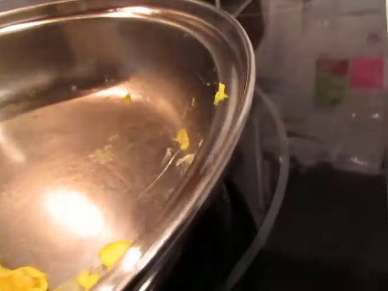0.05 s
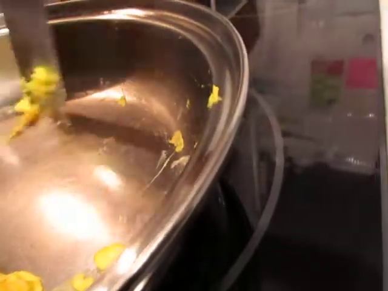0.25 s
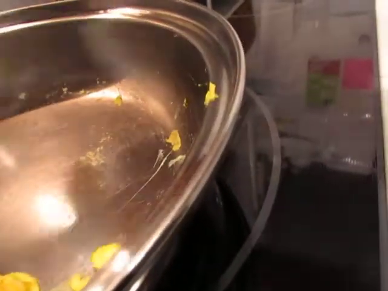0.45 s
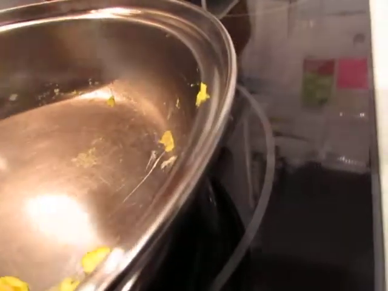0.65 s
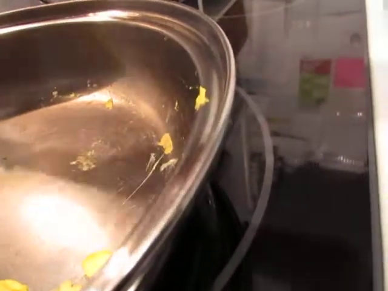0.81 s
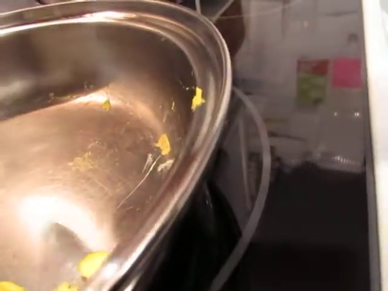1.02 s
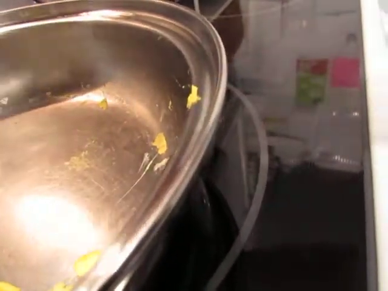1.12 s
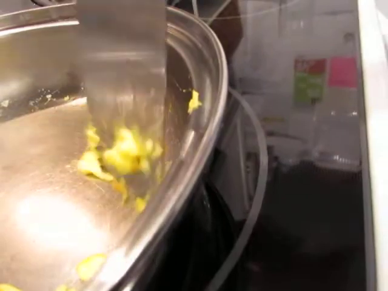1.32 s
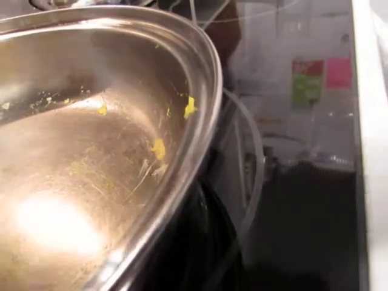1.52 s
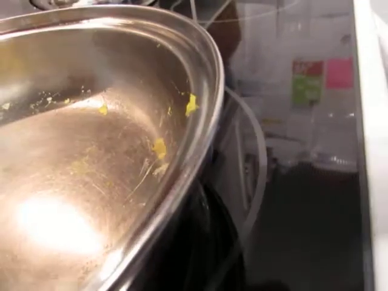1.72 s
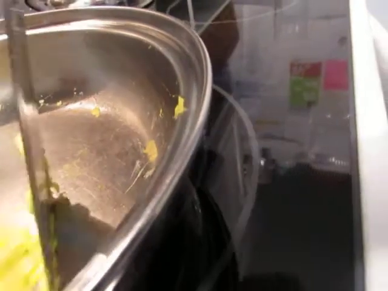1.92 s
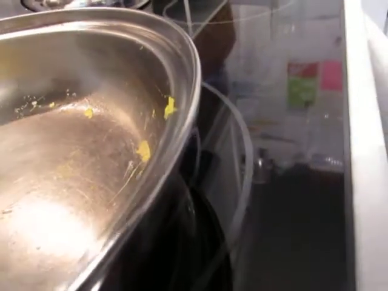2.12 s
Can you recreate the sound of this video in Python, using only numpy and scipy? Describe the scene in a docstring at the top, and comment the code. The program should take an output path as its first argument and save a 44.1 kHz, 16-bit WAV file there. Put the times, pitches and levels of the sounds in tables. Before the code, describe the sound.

A utensil clanks hard on a steel skillet three times, among lighter taps and slightly squeaky scrapes. The pan then thuds on the burner. Egg sizzles faintly and appliances hum in a small kitchen, heard up close.

```python
"""In a small kitchen, appliances hum and egg sizzles faintly as a utensil scrapes a steel skillet.
Friction drives the modes of blade and pan, with brief squeaks where the blade catches. At 0.2, 0.7
and 1.3 s, among lighter taps, hard knocks excite the same pan modes, quickly damped by the egg.
Near 1.9 s the base thuds on the burner grate, and a last scrape follows.
Throughout, the room adds a short reverberation to the direct sound at a nearby camera."""
import sys
import numpy as np
from scipy import signal
from scipy.fft import rfft, irfft, next_fast_len
from scipy.io import wavfile
from scipy.ndimage import uniform_filter1d

SR = 44100
rng = np.random.default_rng(int(sys.argv[2]) if len(sys.argv) > 2 else 0)


def log_audio(samples):
    """Write samples as a 16-bit WAV file to the path given in sys.argv[1]."""
    # one column per channel
    frames = np.atleast_2d(samples).T
    # limit to full scale, then quantise
    limited = np.clip(frames, -1, 1)
    pcm = np.round(limited * 32767).astype(np.int16)
    wavfile.write(sys.argv[1], SR, pcm)


N = 94815
TIME, RING_TIME = np.arange(N) / SR, np.arange(SR // 3) / SR
SIDE = np.array([[.5], [-.5]])  # shares a difference between left and right
TREBLE_HZ = 2840


def amp(db):
    return 10 ** (np.asarray(db) / 20)


def unit(x):
    return x / np.sqrt(np.mean(x ** 2) + 1e-20)


def along(points, hz):
    """Interpolation on a logarithmic frequency axis."""
    f, values = np.transpose(points)
    return np.interp(np.log(hz + 1), np.log(f + 1), values)


def filtered(x, response):
    """Linear filtering: the spectrum times a frequency response."""
    size = next_fast_len(x.shape[-1] + SR // 2)
    return irfft(rfft(x, size) * response(np.fft.rfftfreq(size, 1 / SR)), size)[..., :x.shape[-1]]


def resonances(rows):
    """Superposition of second-order resonators of alternating sign."""
    return lambda f: sum((-1) ** k * amp(db) * 1j * f * width / (hz * hz - f * f + 1j * f * width)
                         for k, (hz, width, db) in enumerate(rows))


def ringing(modes):
    """Modal response: bandwidth is inversely proportional to decay time."""
    return resonances([(hz, np.log(1000) / np.pi / t60, db) for hz, db, t60 in modes])


def tail(t60s):
    """Diffuse decay: each band of stereo noise dies at its own rate."""
    hz, t, spectrum = signal.stft(rng.standard_normal((2, SR // 3)), SR, nperseg=128)
    x = signal.istft(spectrum * amp(-60 * t / along(t60s, hz)[:, None]), SR, nperseg=128)[1]
    return x / np.linalg.norm(x[0])


def grains(per_s, spread_db):
    """Shot noise: independent clicks of uneven size."""
    hit = rng.random(N) < per_s / SR
    return unit(hit * rng.standard_normal(N) * amp(spread_db * rng.exponential(size=N)))


def stereo_noise(response, coherence):
    """Partial coherence: the ratio of mid to side noise sets how alike the channels are."""
    angle = lambda hz: np.arccos(np.clip(along(coherence, hz), -1, 1)) / 2
    mid, side = filtered(rng.standard_normal((2, N)),
                         lambda hz: response(hz) * [np.cos(angle(hz)), np.sin(angle(hz))])
    return unit(np.array([mid + side, mid - side]))


# hum resonances: (frequency [Hz], bandwidth [Hz], gain [dB])
HUM_BANDS = [(46.3, 18, -6), (93, 5.8, -0.5), (154.3, 5.1, -3), (246.4, 10, -2)]
# rumble spectrum: (frequency [Hz], gain [dB])
RUMBLE_SPECTRUM = [(12, -34), (20, -18), (156, -15), (205, -28.5), (248, -28), (900, -24), (1170, -63),
                   (1980, -120)]
# envelope of both: (time [s], relative level [dB])
APPLIANCE_LEVEL = [(0.0, -51), (0.14, -52), (0.43, -60), (0.74, -59), (0.87, -53.5), (1.3, -51.5),
                   (1.85, -53), (2.15, -47)]
# their coherence: (frequency [Hz], left-right correlation [-])
APPLIANCE_COHERENCE = [(40, 1), (200, 0.65), (900, 0.2)]
def appliances():
    """Narrow-band noise fluctuates slowly, giving a wavering hum over a broad rumble."""
    hum = stereo_noise(resonances(HUM_BANDS), APPLIANCE_COHERENCE)
    rumble = stereo_noise(lambda hz: amp(along(RUMBLE_SPECTRUM, hz)), APPLIANCE_COHERENCE)
    return amp(np.interp(TIME, *np.transpose(APPLIANCE_LEVEL))) * (amp(-1) * hum + amp(-2) * rumble)


# frying envelope: (time [s], relative level [dB])
SIZZLE_LEVEL = [(0.0, -46), (0.12, -49), (0.28, -48), (0.45, -54.5), (0.56, -58), (0.77, -55.5),
                (0.91, -42.5), (1.09, -50), (1.41, -53), (1.62, -55.5), (1.84, -55.5), (1.94, -47.5),
                (2.07, -45), (2.15, -46)]
# its spectrum: (frequency [Hz], gain [dB])
SIZZLE_SPECTRUM = [(240, -39), (400, -18), (452, 2.5), (680, -18), (723, -16), (1010, -3), (5680, -2),
                   (14100, -4), (15000, -35.5)]
# its coherence: (frequency [Hz], left-right correlation [-])
SIZZLE_COHERENCE = [(60, 1), (240, -0.11), (950, 0.81), (3770, 0.32), (15000, -0.48)]
def sizzle():
    """Frying egg is a random source: hiss and tiny pops share one spectrum."""
    fizz = lambda hz: amp(along(SIZZLE_SPECTRUM, hz))
    pops = unit(filtered(grains(per_s=1500, spread_db=2), fizz))
    hiss = stereo_noise(fizz, SIZZLE_COHERENCE)
    return amp(np.interp(TIME, *np.transpose(SIZZLE_LEVEL)) + 4.5) * (hiss + amp(-8) * pops)


# room decay: (frequency [Hz], T60 [s])
KITCHEN_T60, KITCHEN_DB = [(200, 0.22), (2000, 0.69), (10000, 0.15)], -22
def kitchen(sound):
    """Reverberation: convolution with a delayed, diffuse room response."""
    delayed = np.pad(sound, ((0, 0), (200, 0)))
    return amp(KITCHEN_DB) * signal.fftconvolve(delayed, tail(KITCHEN_T60), axes=1)[:, :N]


# catches of the blade: (centre time [s], half-length [s], frequency [Hz], relative level [dB])
CATCHES = [(.53, .04, 553, -52), (0.537, 0.024, 2017, -51), (0.863, .02, 1650, -44),
           (0.876, .02, 3400, -34), (0.891, .015, 1765, -42), (0.904, .02, 2140, -34),
           (0.911, .02, 3530, -38), (0.942, .02, 2890, -50), (1.014, .02, 3500, -40),
           (1.068, 0.015, 3470, -30), (0.981, 0.018, 1688, -33), (0.983, 0.017, 3500, -34),
           (0.987, .015, 2220, -31), (1.072, .022, 1560, -32.5), (1.391, .03, 2220, -36.5),
           (1.414, .025, 1480, -34), (1.443, .025, 1420, -48.5), (2.038, .03, 897, -43),
           (2.09, .025, 1910, -38), (2.122, .03, 1944, -38)]
def squeaks(roughness=.25):
    """Stick-slip: the blade catches and one mode sings, rough in amplitude and phase."""
    out = np.zeros(N + SR)
    for time, half_s, hz, db in CATCHES:
        n = round(2 * half_s * SR)
        drift = roughness * unit(uniform_filter1d(rng.standard_normal(SR // 5), size=150))[:n]
        tone = (1 + drift) * np.sin(2 * np.pi * hz * TIME[:n] + drift)
        out[round((time - half_s) * SR):][:n] += amp(db + 3) * np.hanning(n) ** 2 * tone
    return out[:N]


def wandering_contact(x, depth_db=2):
    """Modal coupling depends on position: resonances come and go as the contact wanders."""
    spectrum = signal.stft(x, nperseg=256)[2]
    patches = uniform_filter1d(rng.standard_normal(spectrum.shape), size=3, axis=0)
    patches = uniform_filter1d(patches, size=7, axis=1)
    return unit(signal.istft(spectrum * amp(depth_db * unit(patches)), nperseg=256)[1][:N])


# blade modes: (frequency [Hz], bandwidth [Hz], gain [dB])
BLADE_MODES = [(1000, 60, -9), (1100, 50, -9), (1680, 70, 0), (2140, 120, 0), (2800, 200, -2),
               (3420, 90, -2), (3530, 60, -4), (4150, 90, -8), (5250, 350, -10), (5900, 250, -12),
               (6820, 120, -10), (7500, 150, -11), (8820, 200, -14), (10200, 400, -12)]
# friction spectrum between the modes: (frequency [Hz], gain [dB])
GRIT_SPECTRUM = [(350, -71), (600, -72), (940, -13.5), (1180, -17), (2190, -15.5), (3920, -25),
                 (10300, -13.5), (13700, -5), (15500, -102)]
# one list per stretch of scraping, in relative levels: (time [s], level [dB], treble [dB],
# base rumble [dB]); one scrape runs from 0.76 to 1.04 s, with a tap at 0.975 s
SCRAPE_STRETCHES = [
    [(0.0, -44.5, 9.5, -1.5), (0.022, -39, -30, -24), (0.052, -64, 10, -17), (0.114, -73, 20, -4),
     (0.122, -35, -4, -37), (0.138, -65.5, 15.5, 1), (0.192, -48.5, -7, -12), (0.2, -47, 8, -1)],
    [(0.24, -32, -2, -15), (0.276, -44, -14, -24), (0.286, -30, -14, -25), (0.314, -38.5, -23, -23),
     (0.35, -46.5, -6.5, -33), (0.408, -43, 4, -10.5), (0.488, -55.5, -9, -3), (0.53, -45.5, -5, -19),
     (0.56, -64, 1, -16)],
    [(0.76, -37.5, -2, -12), (0.808, -48.5, -8, -12), (0.836, -45.5, -10, -28), (0.862, -30.5, -6.5, -36),
     (0.898, -31.5, -6, -26), (0.906, -27.5, -5.5, -36), (0.932, -39, 3.5, -19), (0.96, -38.5, 2, -28),
     (0.97, -35.5, -0.5, -28)],
    [(0.995, -42, 3.5, -14), (1.017, -37, -6, -28), (1.031, -44, -8, -19), (1.04, -45, 1, -14)],
    [(1.065, -44, 9.5, -18), (1.073, -37.5, 4.5, -26), (1.099, -59.5, 10, 2), (1.12, -48, -2, -8.5)],
    [(1.35, -31, -9, -2), (1.374, -40.5, -6, -8), (1.414, -46, 3, -18), (1.42, -39.5, -1, -14),
     (1.506, -47, -4.5, 0.5), (1.554, -46.5, -21, -9), (1.578, -42, -17, -8), (1.628, -45.5, -10, -1),
     (1.66, -51, -15, -41)],
    [(1.92, -61, 16, 3), (1.926, -51, 5.5, 15), (1.962, -64.5, 11.5, 11.5), (2.026, -44.5, -2, 3),
     (2.042, -37.5, -11, -21), (2.076, -42.5, -6, 1.5), (2.09, -40, -27, -26), (2.098, -39, -14, -15),
     (2.15, -31.5, -7.5, -17)],
]
def scrapes(fade_s=0.015, top_hz=13300):
    """Forced vibration: grit under the edge drives blade and pan wall, and shakes the base."""
    rows = []
    for stretch in SCRAPE_STRETCHES:
        first, last = stretch[0], stretch[-1]
        rows += [(first[0] - fade_s, -90, *first[2:]), *stretch, (last[0] + fade_s, -90, *last[2:])]
    times, *columns = np.transpose(rows)
    db, treble_db, base_db = [np.interp(TIME, times, column) for column in columns]
    grit = grains(per_s=9000, spread_db=1.5)
    blade = unit(filtered(grit, resonances(BLADE_MODES)))
    wall = unit(filtered(grit, ringing(WALL_MODES)))
    rasp = unit(filtered(grit, lambda hz: amp(along(GRIT_SPECTRUM, hz))))
    steel = wandering_contact(blade + amp(0.5) * wall + amp(-2.5) * rasp)
    steel = filtered(steel, lambda hz: 1 / (1 + (hz / top_hz) ** 30))
    low = filtered(steel, lambda hz: 1 / (1 + (hz / TREBLE_HZ) ** 4))
    base = unit(filtered(rng.standard_normal(N), ringing(BASE_MODES[2:])))
    return amp(db) * (low + amp(treble_db + 5) * (steel - low) + amp(base_db) * base)


def struck_mode(hz, db, t60, scatter_db=1.5, beam_db=5.5):
    """Free vibration: a damped sinusoid of wavering phase, beamed to a random side."""
    start_db = db + scatter_db * rng.normal() + beam_db * SIDE * rng.normal()
    waver = 0.03 * hz / TREBLE_HZ * np.cumsum(rng.standard_normal(len(RING_TIME)))
    return amp(start_db - 60 * RING_TIME / t60) * np.sin(2 * np.pi * hz * RING_TIME + waver)


# modes of the pan base: (frequency [Hz], relative level [dB], T60 [s])
BASE_MODES = [(133.3, -3, 0.29), (184.4, 7.5, 0.098), (307, -0.5, .1)]
def base_thud(low_db, high_db):
    """Impact on the burner grate excites the low modes of the base."""
    first, second, third = [struck_mode(*mode) for mode in BASE_MODES]
    return (amp(low_db) * (first + second) + amp(high_db) * third).mean(axis=0)


# decay of the pan's dense modes: (frequency [Hz], T60 [s])
WASH_T60 = [(300, 0.21), (1500, 0.088), (5000, 0.096), (12000, 0.082)]
# spectrum of a blow: (frequency [Hz], gain [dB])
BLOW_SPECTRUM = [(240, -34), (400, -13.5), (1380, -6), (1840, -8.5), (4650, -20), (5430, -7), (6440, -11.5),
                 (13300, -10.5), (16000, -53)]
def contact_burst(crack_t60=0.0071):
    """A brief contact is broadband: a crack, then a wash of overlapping modes."""
    wash = unit(tail(WASH_T60)[:, :len(RING_TIME)])
    crack = amp(-4.5 - 60 * RING_TIME / crack_t60) * rng.standard_normal(len(RING_TIME))
    hz = np.linspace(0, SR / 2, 129)
    power = amp(2 * along(BLOW_SPECTRUM, hz))  # minimum_phase takes the square root
    colour = signal.minimum_phase(signal.firwin2(255, hz, power, fs=SR))
    return signal.lfilter(colour / np.linalg.norm(colour), 1, crack + amp(-32) * wash)


# egg-damped modes of the pan wall: (frequency [Hz], relative level [dB], T60 [s])
WALL_MODES = [(948, -13.5, 0.075), (1097, -10, 0.05), (1363, -11, 0.061), (1541, -13.5, 0.035),
              (1617, -11.5, 0.037), (1866, -4, 0.052), (2027, -11, 0.12), (2197, -23, 0.14),
              (2600, -8.5, 0.11), (2860, -5, 0.037), (3127, -9.5, 0.032), (3360, -19, 0.13),
              (4365, -8, 0.027), (3634, -7.5, 0.04), (4180, -11, 0.083), (1494.5, -5, 0.023),
              (2880, -6, 0.029), (5330, -2.5, 0.013), (4820, -9.5, 0.033), (5360, -15.5, 0.053),
              (5770, -11.5, 0.12), (6910, -5, 0.027), (7610, -7.5, 0.054), (8240, -30, 0.18),
              (9820, -12.5, 0.053), (10330, -7.5, 0.043), (11200, -36, 0.088)]
def wall_ring(favoured_hz, boost_db=10, width_octaves=0.056):
    """Modal superposition: the striking point favours modes near certain frequencies."""
    boost = lambda hz: sum(boost_db * np.exp(-.5 * (np.log2(hz / centre) / width_octaves) ** 2)
                           for centre in favoured_hz)
    return sum(struck_mode(hz, db + boost(hz), t60) for hz, db, t60 in WALL_MODES)


# blows, in relative levels: (time [s], level [dB], low thud [dB], high thud [dB], treble [dB],
# top band [dB], left minus right [dB], three favoured frequencies [Hz], rise time [ms])
BLOWS = [(0.119, -36, -35, -14.5, -3, -28, 2.5, 1590, 1670, 4690, 0.4),
         (0.217, -1.5, -35.5, -40, -7.5, -15.5, 0.67, 1536, 1720, 5180, 0.48),
         (0.283, -24, -29, -40, -11, -34, 1.5, 1510, 1830, 5200, 0.52),
         (0.342, -29.5, -40, -42, -12.5, -32, 0.5, 940, 2830, 5160, 0.28),
         (0.392, -27.5, -43, -34, -12.5, -16.5, 1.1, 1660, 3040, 5040, 0.94),
         (0.458, -30.5, -26, -14.5, -18, -17, 1.7, 1100, 1980, 5000, 0.59),
         (0.518, -24.5, -45, -32, -20, -29, 1.1, 990, 2150, 6740, 0.27),
         (0.617, -47.5, -28, -28, -6.5, -5.5, 2.2, 1620, 3400, 8000, 0.48),
         (0.662, -44.5, -34, -27, -11, -12.5, 4.5, 1610, 1790, 7240, 0.26),
         (0.725, -5, -30.5, -41, -9, -19.5, 0.38, 932, 3040, 4930, 0.21),
         (0.975, -31.5, -47, -45, 3.5, -6, 2.3, 1550, 2210, 6100, 0.46),
         (1.319, -1.5, -31.5, -19.5, -11, -15.5, 0.33, 1500, 1930, 8600, 0.27),
         (1.384, -23.5, -24, -18.5, -17, -17.5, 1.5, 1510, 2200, 5650, 0.4),
         (1.406, -27, -38, -27, -14.5, -16.5, 1.9, 1490, 2900, 5570, 0.33),
         (1.428, -33, -44, -34, -1, -11, 1.6, 1410, 2200, 6250, 0.33),
         (1.452, -26, -40, -23, -10, -31, 1.3, 1520, 1930, 5850, 0.33),
         (1.579, -31.5, -24, -21, -16, -25, 1.3, 1530, 1840, 5400, 0.51),
         (1.761, -43.5, -29, -29, -12.5, -9, 5.8, 1110, 1940, 5550, 0.5),
         (1.89, -17.5, -15.5, -8, -21.5, -25, 0.29, 1320, 1826, 4470, 0.22),
         (2.088, -28, -29, -29, -22, -33, 1.7, 1100, 1870, 4850, 0.67)]
def knocks(top_band_hz=9000, lag_s=0.001025, thud_lead_s=.0012):
    """Impulse excitation: each blow of the utensil sets wall and base ringing anew."""
    out, n = np.zeros((2, N + SR)), len(RING_TIME)
    lowpasses = [signal.butter(2, hz, fs=SR, output="sos") for hz in (TREBLE_HZ, top_band_hz)]
    for time, db, low_db, high_db, treble_db, top_db, balance_db, *favoured_hz, rise_ms in BLOWS:
        attack = 1 - np.exp(-(1000 * RING_TIME / rise_ms) ** 2)
        wall = attack * (contact_burst() + amp(-12) * wall_ring(favoured_hz))
        low, body = [signal.sosfilt(sos, wall) for sos in lowpasses]
        clank = low + amp(treble_db + 10) * (body - low) + amp(top_db + 17.5) * (wall - body)
        onset = time + lag_s
        out[:, round(onset * SR):][:, :n] += amp(db + SIDE * balance_db) * clank
        out[:, round((onset - thud_lead_s) * SR):][:, :n] += amp(db + 3) * base_thud(low_db, high_db)
    return out[:, :N]


# stereo balance of the direct sound: (frequency [Hz], left minus right [dB])
PAN_BALANCE = [(300, 1), (950, 1.5), (2400, 3), (6000, 2), (9000, -1), (13000, 1.5)]
def scene(right_delay_s=1.8e-5):
    """Level and time differences place the pan slightly left, before the room and background."""
    pan = knocks() + scrapes() + squeaks()
    direct = filtered(pan, lambda hz: amp(SIDE * along(PAN_BALANCE, hz))
                      * np.exp(2j * np.pi * hz * SIDE * right_delay_s))
    return direct + kitchen(pan) + sizzle() + appliances()


LOW_CUT_HZ, BAND_LIMIT_HZ = 69, 16450
def record(dry):
    """Band limiting and saturation: the microphone drops deep bass; the camera clips and cuts the top."""
    heard = signal.sosfilt(signal.butter(2, LOW_CUT_HZ, "high", fs=SR, output="sos"), dry)
    return filtered(np.clip(heard, -1, 1), lambda hz: hz < BAND_LIMIT_HZ)


dry = scene()
out = record(dry)
log_audio(out)
```